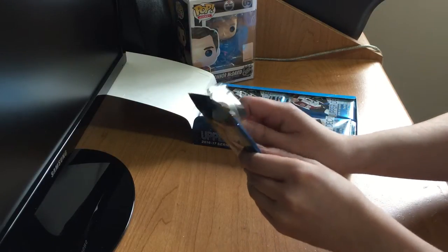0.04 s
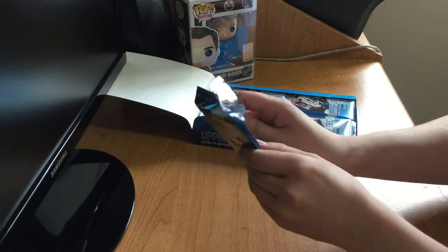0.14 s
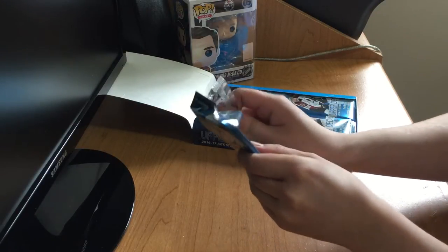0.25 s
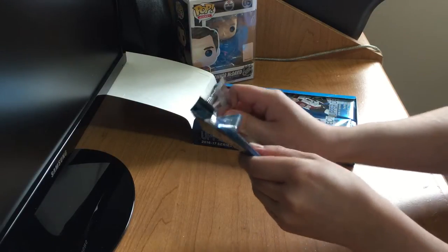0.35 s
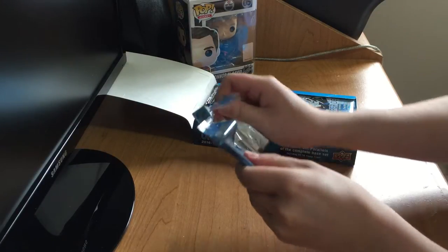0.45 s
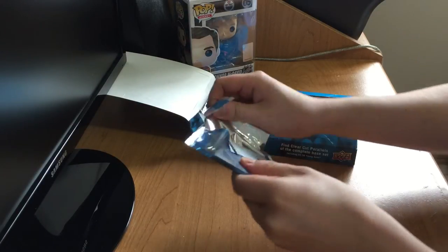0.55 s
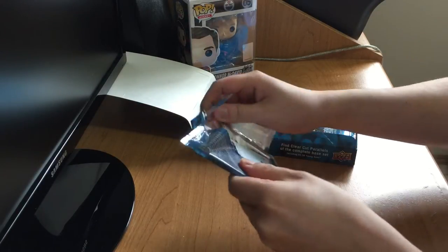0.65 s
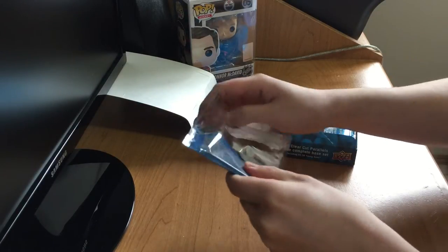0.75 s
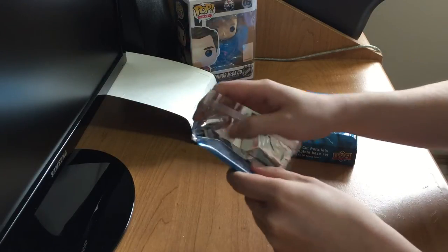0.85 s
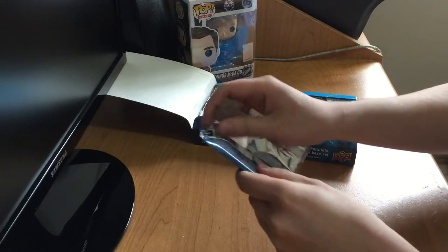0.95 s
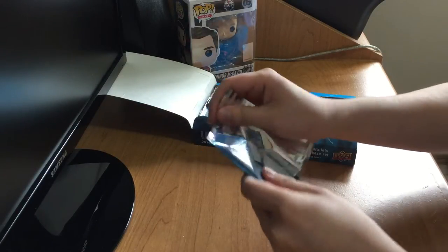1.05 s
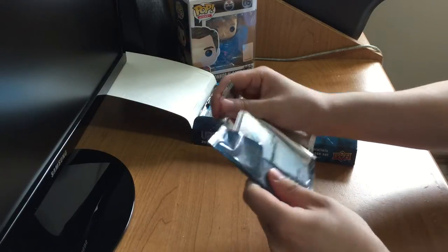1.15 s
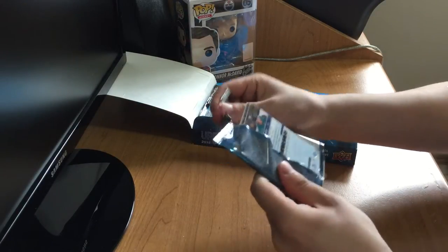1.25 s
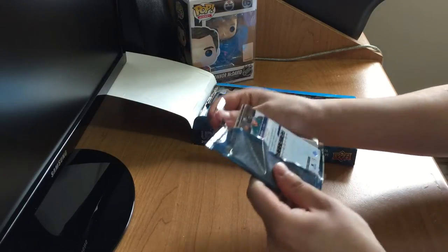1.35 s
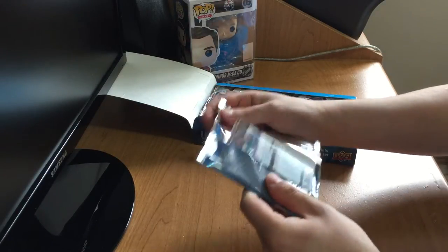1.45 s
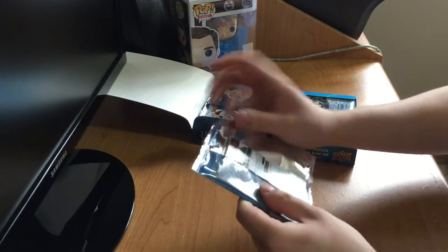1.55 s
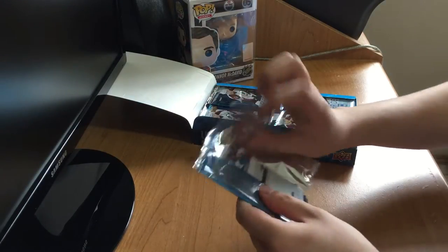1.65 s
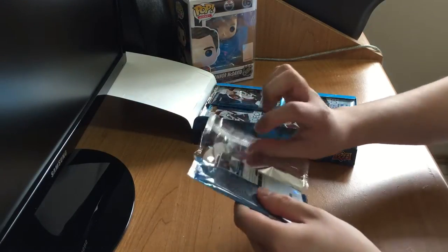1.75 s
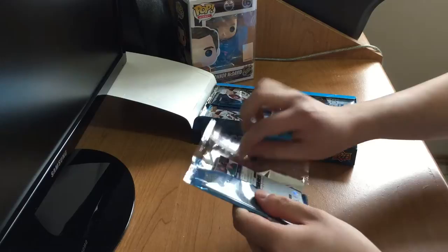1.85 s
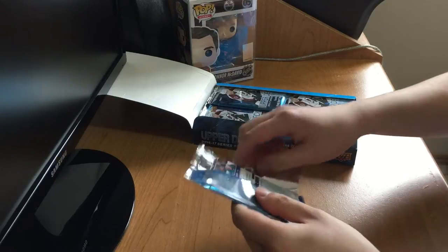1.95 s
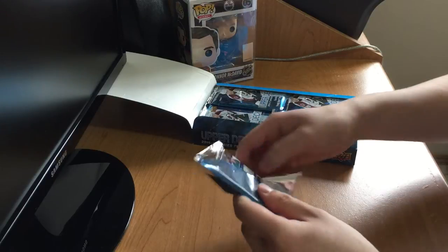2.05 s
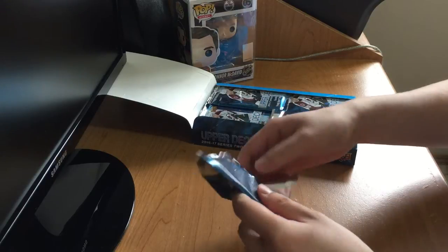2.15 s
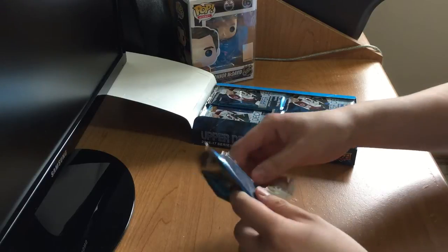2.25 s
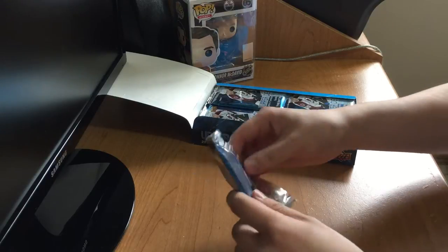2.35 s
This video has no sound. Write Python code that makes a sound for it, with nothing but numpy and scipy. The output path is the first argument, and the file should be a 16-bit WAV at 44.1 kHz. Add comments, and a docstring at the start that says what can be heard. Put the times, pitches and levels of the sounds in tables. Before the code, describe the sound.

A thin foil packet crackles close to the microphone: fine rustles and bright snaps, a tiny squeak, a short seam rip near half a second, then looser crinkles, soft pops and a few faint clicks in a small room.

```python
"""Hands peel open a foil trading-card pack above a wooden desk, close to the microphone.
First the foil rustles with tiny buckles, creases snap and a fingertip squeaks; then the seam rips in quick slips.
The wrapper flops with soft pitched pops as the cards are worked loose, and a few light clicks follow.
Snaps and buckles are bursts of dying tones, pops are single fading tones, the squeak is a falling wavering tone.
Throughout, the desk and a small room answer with echoes over a steady hush of filtered noise."""
import sys
import numpy as np
from scipy import signal
from scipy.fft import rfft, irfft, next_fast_len
from scipy.io import wavfile
from scipy.ndimage import uniform_filter1d

SR = 44100
rng = np.random.default_rng(int(sys.argv[2]) if len(sys.argv) > 2 else 0)


def master(y):
    """Save y as 16-bit WAV."""
    cut = np.clip(np.atleast_2d(y).T, -1, 1)
    pcm = np.round(cut * 32767)  # scale
    wavfile.write(sys.argv[1], SR, pcm.astype(np.int16))


N = 105840

# Creases snapping: t/s, level/dB, brightness/(dB per octave), ring of the facet f/Hz,
# push of the sheet relative to the crack level/dB
CREASE_SNAPS = [(0.1005, -34, -0.5, 4630, -16), (0.139, -33, 2, 6200, -15), (0.2712, -27, 0, 7460, -28),
                (0.273, -20, -0.5, 7830, -25), (0.317, -24, 3.5, 4500, -23), (0.4022, -27, -1, 8800, -16),
                (0.4384, -24.5, 7, 8350, -16), (0.5378, -17.5, -2, 7030, -14),
                (0.5547, -24, 1.5, 1900, -1.5), (0.5673, -28, -1, 2080, 2.5), (0.5784, -21.5, 9, 9700, -14),
                (0.5878, -15.5, 0, 2430, -6.5), (0.6278, -39, 5, 5800, -25),
                (0.7275, -29.5, -1, 1840, -3.5), (0.7514, -39.5, -10, 3120, 0),
                (0.8083, -28, 0, 12100, -6.5), (0.831, -23.5, 0, 1890, -13.5),
                (0.8942, -26.5, 3, 8660, -14.5), (0.9038, -29.5, 2, 5900, -13),
                (1.0315, -31, -1, 2920, -18), (1.0339, -32, -0.5, 6150, -16.5),
                (1.0818, -37.5, 1, 6100, -11), (1.1237, -36.5, -1, 3030, -3.5),
                (1.1558, -34.5, -1.5, 3060, -11.5), (1.17, -32.5, 0, 2940, -19),
                (1.222, -31, 0.5, 4740, -0.5), (1.227, -25.5, -2.5, 6560, -8),
                (1.2442, -35.5, 1, 3570, -11), (1.2625, -20.5, -1.5, 8100, -9.5),
                (1.3584, -27, 0.5, 3040, -8), (1.3983, -28, 4.5, 6470, -8), (1.4199, -25, -2, 2550, -5),
                (1.53, -28, -0.5, 5950, -11), (1.543, -29.5, -4, 2710, -10.5), (1.5721, -31, 2, 11930, -14),
                (1.6191, -34.5, 4.5, 7200, -14.5), (1.6302, -33.5, -2, 8440, -15.5),
                (1.662, -41.5, 1.5, 7760, -13), (1.6755, -36.5, 3.5, 7300, -16),
                (1.6835, -38.5, 0.5, 8600, -12.5), (1.7553, -34, 1, 3470, -9),
                (1.7949, -42.5, -2, 6060, -6.5), (1.951, -59.5, -3.5, 3060, -13),
                (2.0007, -53.5, 8.5, 11600, -34), (2.0892, -57.5, -9, 2360, -9.5),
                (2.1143, -45.5, -2, 6340, -19.5), (2.1295, -32.5, 3.5, 1940, -12.5),
                (2.141, -30.5, -0.5, 8250, -23), (2.1534, -32.5, 0, 4620, -47),
                (2.2924, -35, -3, 4470, -16), (2.3209, -29.5, -0.5, 3030, -28),
                (2.3931, -39.5, -4, 3360, -16)]
# Finger strokes that crumple or rub the foil, before RUSTLE_GAIN_DB:
# start t/s, length t/s, level/dB, brightness/(dB per octave)
FINGER_STROKES = [(0, 0.092, -44, -1), (0.135, 0.036, -38.5, 1.5), (0.185, 0.04, -33.5, 1),
                  (0.235, 0.028, -36.5, 1), (0.277, 0.09, -44, 2), (0.382, 0.032, -36, 3),
                  (0.404, 0.022, -27.5, 0.5), (0.43, 0.15, -39.5, 2.5), (0.493, 0.035, -32, 8),
                  (0.613, 0.19, -46.5, -2), (0.83, 0.022, -37.5, -3), (0.878, 0.0095, -35.5, 1),
                  (1.017, 0.054, -47.5, 0.5), (1.127, 0.088, -46.5, -1.5), (1.225, 0.055, -38.5, 0),
                  (1.29, 0.13, -43, -2), (1.397, 0.023, -32.5, 0), (1.491, 0.032, -52.5, 2.5),
                  (1.527, 0.029, -43, -1.5), (1.573, 0.18, -51.5, 3), (1.738, 0.038, -45.5, 0),
                  (1.831, 0.052, -65.5, 4), (2.123, 0.056, -47.5, -2), (2.277, 0.12, -56.5, -1)]
# The seam giving way: start t/s, length t/s, level/dB, brightness/(dB per octave)
SEAM_RIPS = [(0.404, 0.021, -39.5, 5), (0.516, 0.022, -29, 2.5), (0.538, 0.03, -28.5, 1),
             (0.579, 0.0083, -25, 0.5)]
# The whole wrapper flexing with a soft pop: t/s, level/dB, pitch f/Hz
WRAPPER_FLOPS = [(0.198, -48, 363), (.566, -33.5, 427), (0.587, -41.5, 256), (0.838, -42.5, 390),
                 (0.8933, -43.5, 270), (1.156, -44.5, 332), (1.222, -39, 348), (1.2269, -38, 228),
                 (1.262, -43.5, 253), (1.357, -41.5, 237), (2.171, -48.5, 622)]
# A fingertip squeaking on the foil: start t/s, length t/s, level/dB, first pitch f/Hz, last pitch f/Hz
FINGER_SQUEAK = (.236, .026, -37, 3250, 2650)
# Filter curve of a crack, before its own brightness: f/Hz, level/dB
CRACK_COLOUR = [(200, -44.5), (1100, -28), (2000, -0.5), (7000, -1), (11000, -4.5), (16000, -7)]
# Filter curve of the push of a larger area: f/Hz, level/dB
PUSH_COLOUR = [(60, -48), (400, -9), (700, -0.5), (1100, -1), (2200, -17), (5000, -45.5)]
# Filter curve of the fine crumpling, before each stroke's brightness: f/Hz, level/dB
CRUMPLE_COLOUR = [(50, -50.5), (430, -19), (750, 1.5), (1400, -5), (2400, -3), (7000, -3), (16000, -10.5)]
# Filter curve of the parting seam, before each rip's brightness: f/Hz, level/dB
SEAM_COLOUR = [(50, -37.5), (300, -11.5), (700, 6), (2200, 0.5), (4000, -9), (16000, -10.5)]
# Filter curve of the room's hush: f/Hz, level/dB
HUSH_COLOUR = [(25, -26), (70, -2.5), (200, -1), (450, -8.5), (2500, -15), (8000, -21), (16000, -30)]
# Time the room's tail takes to fall by 60 dB: f/Hz, t/s
ROOM_DECAY = [(200, 0.21), (1500, 0.35), (3500, 0.19), (16000, 0.15)]

# T60 is the time to fall by 60 dB
CRACK_T60_S, RING_T60_S, PUSH_T60_S, FLOP_T60_S = 0.0065, 0.0061, 0.03, 0.016
RING_DB, ONSET_S = -5, 0.0006  # ring of a snap's facet relative to its other tones; rise of every facet
POUCH_HZ, POUCH_DB = 951, -2.5  # middle pitch of the half-open pouch; its level relative to the push
BUCKLES_PER_S, FIRM_STROKE_DB = 1000, -37  # average buckling rate in a stroke of this level
SLIPS_PER_S, RUSTLE_GAIN_DB = 1300, -0.5
ATTACK_S, RELEASE_S = 0.0015, 0.0093  # of a run of buckles or slips
LEVEL_WINDOW_S = 0.004  # levels of snaps and flops are averages over this time
TOP_HZ = 16150  # band limit


def snaps():
    """Each crease cracks and pushes the sheet around it."""
    out = np.zeros(N)
    for start, db, tilt, ring_hz, push_db in CREASE_SNAPS:
        burst = facet(CRACK_T60_S, ring_hz, RING_DB, kick=0.29)
        crack = energy_one(coloured(burst, CRACK_COLOUR, tilt))
        add(out, start, amp(db) * (crack + amp(push_db) * puff()))
    return out * np.sqrt(LEVEL_WINDOW_S * SR)


def facet(t60, ring_hz, ring_db, kick, size=2048, count=48):
    """One small flat piece of foil jumps: a kick, many quickly dying tones and one that stands out."""
    t = np.arange(size) / SR
    # One tone at a random place in each equal slice of the band
    hz = (np.arange(count) + rng.random(count))[:, None] / count * TOP_HZ
    life = t60 * np.exp(0.37 * rng.standard_normal((count, 1)))
    tones = np.sin(2 * np.pi * (hz * t + rng.random((count, 1))))
    cluster = energy_one(np.sum(tones * amp(-60 * t / life), 0))
    main = energy_one(np.sin(2 * np.pi * ring_hz * t) * amp(-60 * t / RING_T60_S))
    onset = 1 - np.exp(-t / ONSET_S)
    ring = energy_one((cluster + amp(ring_db) * main) * onset)
    ring[0] += kick
    return ring


def puff(size=2048):
    """A damped push of a larger area of the wrapper, with the hollow note of the pouch."""
    t = np.arange(size) / SR
    fade = amp(-60 * t / PUSH_T60_S)
    push = energy_one(coloured(rng.standard_normal(size) * fade, PUSH_COLOUR))
    note_hz = POUCH_HZ * np.exp(0.07 * rng.standard_normal())
    note = np.sin(2 * np.pi * note_hz * t) * fade
    return energy_one(push + amp(POUCH_DB) * energy_one(coloured(note, PUSH_COLOUR)))


def rip():
    """The seam parts in quick slips that drive the taut wrapper."""
    out = np.zeros(N)
    for start, length, db, tilt in SEAM_RIPS:
        run = crackle(length, SLIPS_PER_S, scatter_db=-0.5, t60=0.004, colour=SEAM_COLOUR, tilt=tilt)
        add(out, start, amp(db) * run)
    return out


def rustle():
    """Foil crumples finely under the fingers; a light touch sets off fewer buckles."""
    out = np.zeros(N)
    for start, length, db, tilt in FINGER_STROKES:
        rate = BUCKLES_PER_S * np.sqrt(amp(db - FIRM_STROKE_DB))
        run = crackle(length, rate, scatter_db=6, t60=0.0091, colour=CRUMPLE_COLOUR, tilt=tilt)
        add(out, start, amp(db) * run)
    return out * amp(RUSTLE_GAIN_DB)


def crackle(length, rate, scatter_db, t60, colour, tilt, count=20):
    """Tiny uneven jumps are shared among small and large facets, which ring high and low."""
    t = np.arange(SR // 4) / SR
    shape = np.minimum(t / ATTACK_S, 1) * np.exp(-np.maximum(t - length, 0) / RELEASE_S)
    hits = rng.random((count, len(t))) < rate / count / SR
    sizes = amp(scatter_db * np.clip(rng.standard_normal(hits.shape), -2, 2))
    signs = rng.choice([-1, 1], hits.shape)
    rings_hz = np.geomspace(1900, 12000, count) * np.exp(0.097 * rng.standard_normal(count))
    run = np.zeros(len(t))
    for jumps, ring_hz in zip(hits * sizes * signs, rings_hz):
        ring = facet(t60, ring_hz, ring_db=-1, kick=0.35)
        run += signal.fftconvolve(jumps * shape, ring)[:len(t)]
    # Average level 1 over the given length
    return energy_one(coloured(run, colour, tilt)) * np.sqrt(length * SR)


def flops():
    """The pouch pops in and out at a pitch set by how far it is open."""
    out = np.zeros(N)
    t = np.arange(SR // 8) / SR
    for start, db, hz in WRAPPER_FLOPS:
        # t ** 2 makes the start soft
        pop = np.sin(2 * np.pi * hz * t) * amp(-60 * t / FLOP_T60_S) * t ** 2
        add(out, start, amp(db) * energy_one(pop))
    return out * np.sqrt(LEVEL_WINDOW_S * SR)


def squeak(jitter=0.14, overtone_db=-3):
    """Skin sticks and slips on the foil at a falling, unsteady rate."""
    start, length, db, first_hz, last_hz = FINGER_SQUEAK
    n = int(length * SR)
    out = np.zeros(N)
    unsteady = uniform_filter1d(rng.standard_normal(n), size=16)
    pitch_hz = np.linspace(first_hz, last_hz, n) * (1 + jitter * unsteady / unsteady.std())
    phase = 2 * np.pi * np.cumsum(pitch_hz) / SR
    tone = np.sin(phase) + amp(overtone_db) * np.sin(2 * phase)
    add(out, start, amp(db) * tone * signal.windows.tukey(n, 0.3))
    return out


def room(x, early_db, tail_db):
    """Early answers of desk and screen, then a tail that dies at its own speed in each band."""
    t = np.arange(SR // 2) / SR
    hz, frames, bands = signal.stft(rng.standard_normal(len(t)), SR, nperseg=256)
    decay = amp(-60 * frames / along(ROOM_DECAY, hz)[:, None])
    tail = signal.istft(bands * decay, SR, nperseg=256)[1][:len(t)]
    tail = energy_one(tail * np.minimum(t / 0.013, 1))
    # Sparse random echoes that begin after 2 ms
    echoes = rng.standard_normal(len(t)) * (rng.random(len(t)) < 0.04) * (t > 0.002)
    early = energy_one(echoes * np.exp(-t / 0.0039))
    return signal.fftconvolve(x, amp(early_db) * early + amp(tail_db) * tail)[:N]


def air(db):
    """The steady hush of the room, made of filtered noise."""
    hush = energy_one(coloured(rng.standard_normal(N), HUSH_COLOUR))
    return amp(db) * np.sqrt(N) * hush


def amp(db):
    """Turn decibels into a plain multiplier."""
    return 10 ** (np.asarray(db) / 20)


def along(points, hz):
    """Read a curve of (Hz, value) points, with frequency on a log axis."""
    f, v = np.transpose(points)
    return np.interp(np.log(hz + 1), np.log(f + 1), v)


def energy_one(x):
    """Scale x so that its squares add up to 1."""
    return x / np.sqrt(np.sum(x ** 2) + 1e-20)


def coloured(x, points, tilt=0):
    """Filter x by a curve, tilted above 1500 Hz in dB per octave, with no sound ahead of its cause."""
    m = 2 * next_fast_len(len(x))
    hz = np.fft.rfftfreq(m, 1 / SR)
    octaves = np.log2(np.maximum(hz, 1500) / 1500)
    # Folding the cepstrum (spectrum of the log gain) forward in time gives a minimum-phase filter
    cepstrum = irfft(np.log(amp(along(points, hz) + tilt * octaves)), m)
    cepstrum[1:m // 2] *= 2
    cepstrum[m // 2 + 1:] = 0
    return irfft(rfft(x, m) * np.exp(rfft(cepstrum)), m)[:len(x)]


def add(track, start, x):
    """Mix x into the track from start, in seconds."""
    i = int(np.clip(round(start * SR), 0, N - 1))
    track[i:i + len(x)] += x[:N - i]


def scene():
    """The wrapper in the hands, heard directly and through the room."""
    foil = snaps() + rip() + rustle() + flops() + squeak()
    return (foil + room(foil, early_db=-9.0, tail_db=-10.5) + air(db=-67))[None]


def record(dry):
    """Fade out the treble across 400 Hz around the band limit; nothing is kept above."""
    m = next_fast_len(N + SR // 2)
    edge = np.clip((TOP_HZ - np.fft.rfftfreq(m, 1 / SR)) / 400 + 0.5, 0, 1)
    return irfft(rfft(dry, m) * edge, m)[..., :N]


dry = scene()
out = record(dry)
master(out)
```